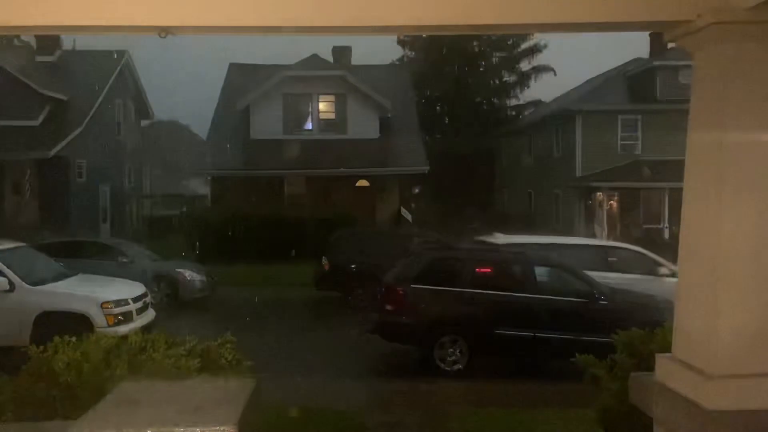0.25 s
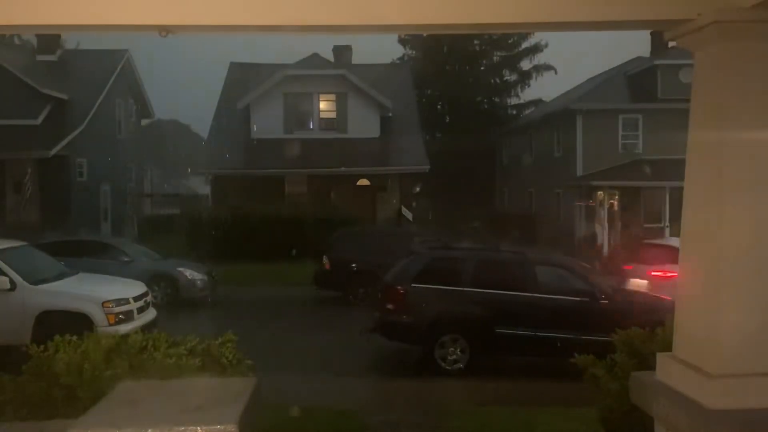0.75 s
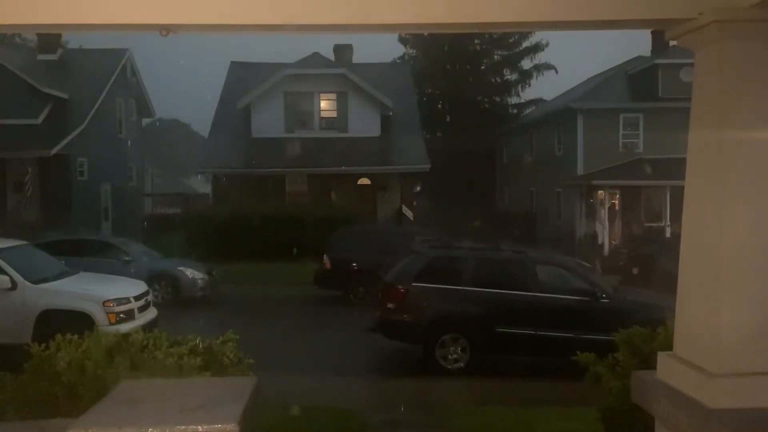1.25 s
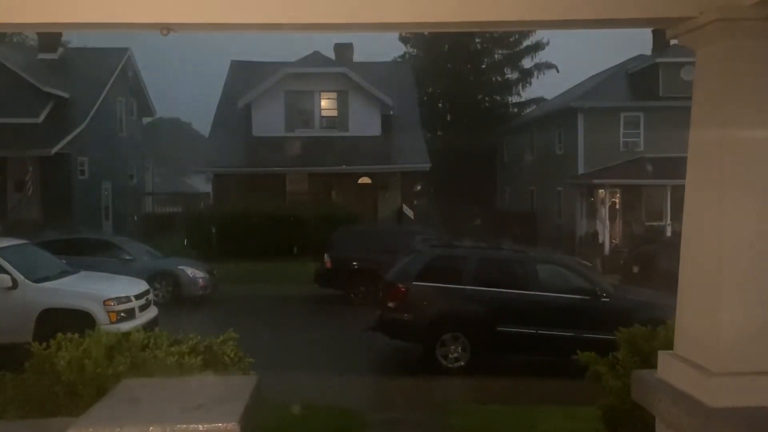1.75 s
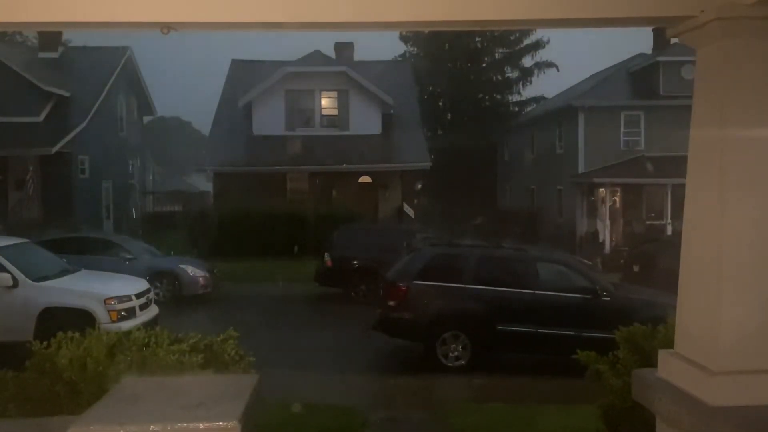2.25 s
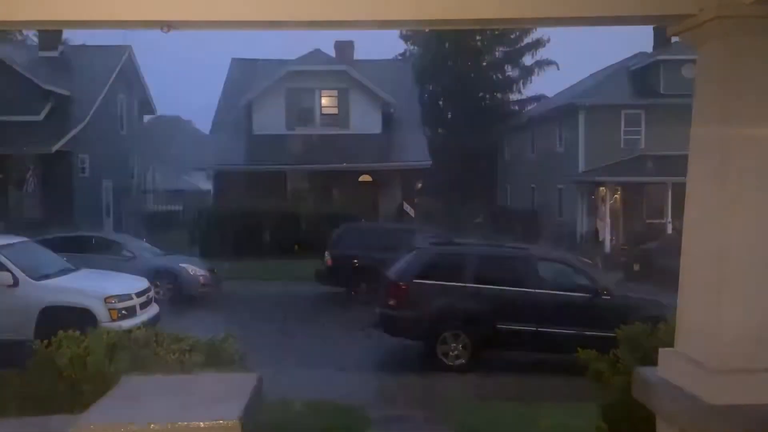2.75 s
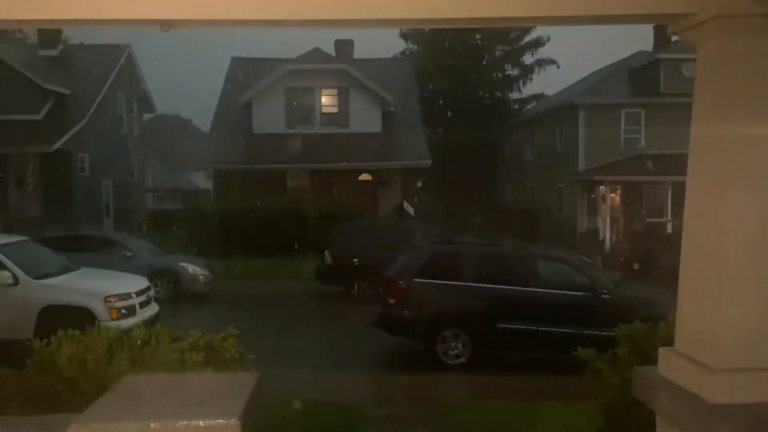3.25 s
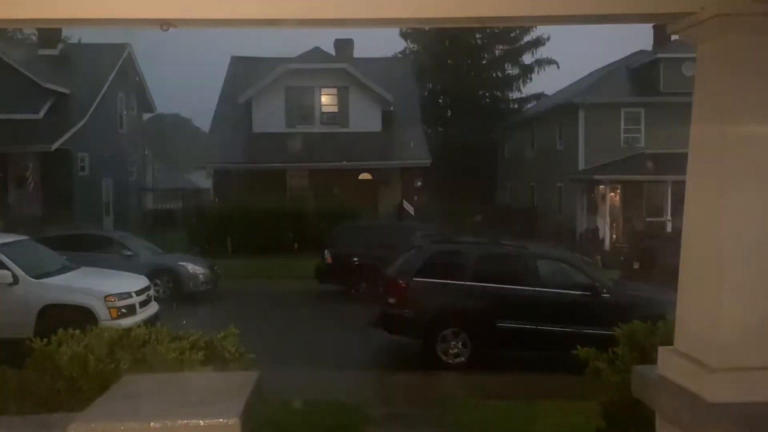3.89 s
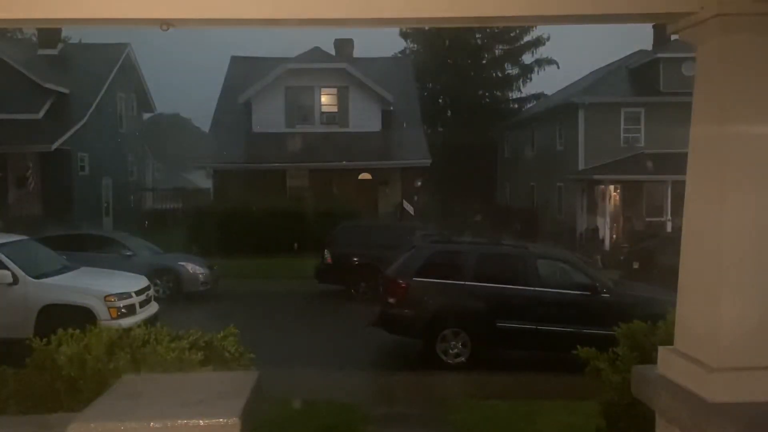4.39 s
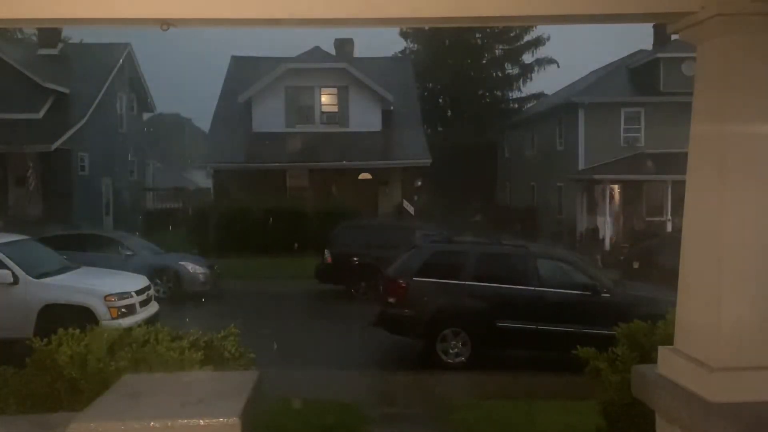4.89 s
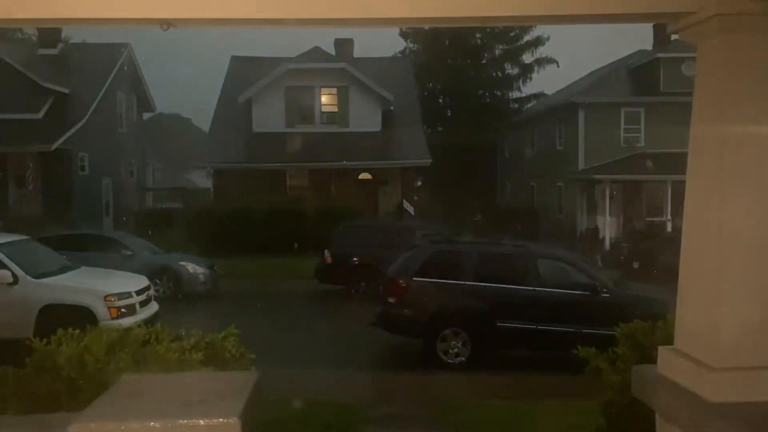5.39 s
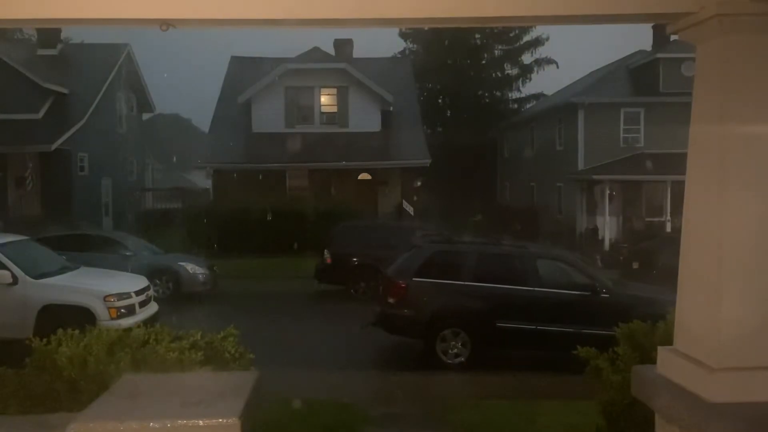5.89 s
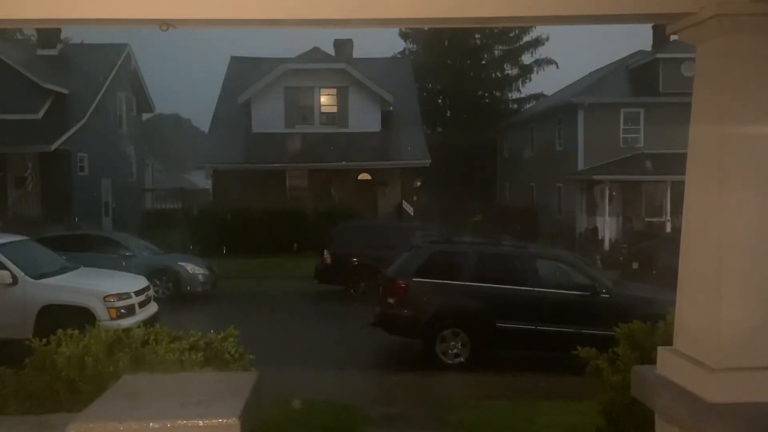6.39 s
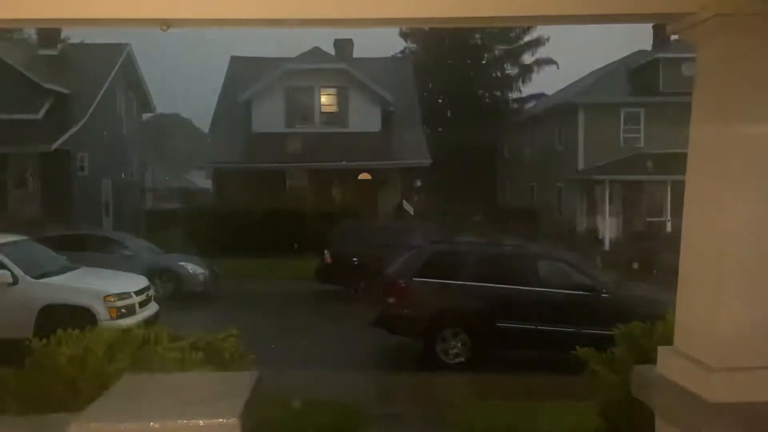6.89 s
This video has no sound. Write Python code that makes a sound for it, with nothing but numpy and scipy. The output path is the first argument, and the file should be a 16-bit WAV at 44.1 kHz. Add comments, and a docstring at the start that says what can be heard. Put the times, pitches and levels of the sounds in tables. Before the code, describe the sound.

Heard from under a porch, low thunder is already rolling, with round booms crowding the first two seconds. It then sinks into a long rumble with weaker swells. Steady rain washes the street while nearer drops patter, run-off splashes and fat drips click. A few dull, hollow knocks come close by, the clearest midway, and a tiny squeak occurs early.

```python
"""Distant thunder rolls and slowly fades over heavy rain on a residential street, heard from under a porch. It
is a crowd of random impulses, filtered into four bands that swell in peals, with sine booms on top. The rain is
filtered impulses: a far wash, a patter of drops, splashes of run-off and of wet knocks, fat drips and tiny
ticks. Dull knocks (noisy rattle, decaying modes) and a short squeak (wavering sines) sound nearby; a faint tone
comes up late. Porch resonances colour thunder, rain and splashes; impacts of water and knocks echo briefly."""
import sys
import numpy as np
from scipy import signal
from scipy.fft import rfft, irfft
from scipy.io import wavfile
from scipy.ndimage import uniform_filter1d

SR = 44100
rng = np.random.default_rng(int(sys.argv[2]) if len(sys.argv) > 2 else 0)


def log_audio(samples):
    """Write samples as a 16-bit WAV file to the path given in sys.argv[1]."""
    # one column per channel
    frames = np.atleast_2d(samples).T
    # limit to full scale, then quantise
    limited = np.clip(frames, -1, 1)
    pcm = np.round(limited * 32767).astype(np.int16)
    wavfile.write(sys.argv[1], SR, pcm)


N = 314918
TIME = np.arange(N) / SR  # s
FREQ = np.maximum(np.arange(N // 2 + 1) * SR / N, 1)  # Hz, kept above 0 for logarithms


def undb(db):
    """Level definition: decibels to amplitude gain."""
    return 10 ** (np.asarray(db) / 20)


def unit(x):
    """Power normalisation: scale to rms 1."""
    return x / np.sqrt(np.mean(x ** 2))


def spectrum(points):
    """Spectral interpolation: join (f/Hz, value) points on a log-frequency axis."""
    hz, value = np.transpose(points)
    return np.interp(np.log(FREQ), np.log(hz), value)


def bell(centre_hz, spread):
    """Band emphasis: a broad hump in dB, 6 dB down `spread` octaves from its centre."""
    octaves = np.log2(FREQ / centre_hz)
    return -20 * np.log10(1 + (octaves / spread) ** 2)


def colour(x, db):
    """Linear filtering: apply a gain in dB at every frequency, then scale to rms 1."""
    return unit(irfft(rfft(x) * undb(db), N))


def walk(rate):
    """Low-pass noise: a smooth random curve with spread 1; `rate` in Hz sets its quickness."""
    lowpass = np.exp(-(FREQ / rate) ** 2)
    return unit(irfft(rfft(rng.standard_normal(N)) * lowpass, N))


def impacts(rate, scatter_db):
    """Shot noise: two unrelated streams of `rate` impulses per s, sizes scattered exponentially in dB."""
    hit = rng.random((2, N)) < rate / SR
    size = undb(scatter_db * np.minimum(rng.exponential(size=(2, N)), 5))
    sign = rng.choice([-1, 1], (2, N))
    return unit(hit * size * sign)


def echo(x, t60, wet_db):
    """Diffuse reverberation: each impact trails its own noise, whose level falls 60 dB in t60 s."""
    keep = np.exp(-2 * np.log(1000) / (t60 * SR))
    energy = signal.lfilter([1 - keep], [1, -keep], x ** 2)
    reflections = np.sqrt(energy) * rng.standard_normal(x.shape)
    return unit(x + undb(wet_db) * reflections)


def swell(s, rise, decay):
    """Transient envelope: a Gaussian climb to 1 at s, then exponential decay (1/e times, s)."""
    t = TIME - s
    return np.exp(-np.minimum(np.where(t < 0, (t / rise) ** 2, t / decay), 50))


def burst(source, s, rise, decay):
    """Energy scaling: shape a sound by a swell and give it the energy of rms-1 noise so shaped."""
    shape = swell(s, rise, decay)
    return unit(source * shape) * np.sqrt(np.mean(shape ** 2))


# resonances of the porch: f/Hz, full width at half the lift/Hz, lift/dB
PORCH_MODES = [(112, 22, 1.5), (132, 13, 4), (277.5, 13, 10.5), (428, 7.7, 6), (502, 30, 3.5),
               (1283, 70, 5.5), (2103, 120, 4), (2860, 110, 1)]


def porch_resonances():
    """Resonance: the porch lifts the sound around each of its modes; result in dB."""
    return sum(db / (1 + (2 * (FREQ - hz) / width) ** 2) for hz, width, db in PORCH_MODES)


# long rumble, one row each for sub-bass, deep part, body and growl: level at start/dB, fade/(dB/s)
RUMBLE_FADES = [(-44, 0.59), (-40.5, 0.27), (-42.5, 0.38), (-45.5, 0.31)]
# peals out of the rumble: crest t/s, sub-bass level/dB, deep level/dB, body level/dB, growl level/dB, rise/s
PEAL_SWELLS = [(0.069, -36, -41.5, -40, -52.5, 0.069), (0.3, -44, -53, -41.5, -46.5, 0.097),
               (0.5, -42.5, -47.5, -44, -53.5, 0.09), (0.65, -53, -30, -39, -45, 0.032),
               (0.76, -47.5, -37.5, -36, -50, 0.098), (0.87, -32.5, -43, -39, -47.5, 0.04),
               (0.98, -42.5, -34.5, -38, -43.5, 0.11), (1.17, -40.5, -42.5, -33, -48.5, 0.091),
               (1.32, -49, -34.5, -37.5, -57, 0.072), (1.70, -46.5, -35.5, -36, -56.5, 0.08),
               (1.95, -47, -47, -35, -44, 0.039), (2.82, -45, -46, -40, -47, 0.35),
               (3.42, -54, -44, -41.5, -43.5, 0.22), (3.6, -51, -36.5, -43, -49, 0.05),
               (5.4, -54.5, -42.5, -45.5, -54, 0.29), (6.28, -44, -52.5, -38, -48, 0.09)]
PEAL_TAIL = 1.55  # a peal's decay time over its rise time


def rolling():
    """Incoherent addition: peals add their power to the fading rumble; gives four band levels."""
    power = np.array([undb(db - fade * TIME) ** 2 for db, fade in RUMBLE_FADES])
    for s, sub_db, deep_db, body_db, growl_db, rise in PEAL_SWELLS:
        crest = undb([[sub_db], [deep_db], [body_db], [growl_db]])
        power = power + (crest * swell(s, rise, PEAL_TAIL * rise)) ** 2
    return np.sqrt(power)


# colour of the thunder, effective within each band: f/Hz, relative density level/dB per Hz
THUNDER_COLOUR = [(20, -32.5), (30, -18.5), (45, -7), (60, -1), (75, -3.5), (100, 7), (122, -0.5), (155, 1),
                  (180, -7), (225, -11), (250, -18), (285, -21.5), (320, -22.5), (1000, -54)]


def thunder(sub_hz=78, deep_hz=120, growl_hz=185, throb_db=0.7, throb_hz=7):
    """Superposition: waves from all along the lightning channel arrive in a crowd, dulled by distance."""
    sub, deep, body, growl = rolling()
    arrivals = impacts(rate=900, scatter_db=0.35)
    waves = rfft(arrivals) * undb(spectrum(THUNDER_COLOUR) + porch_resonances())
    below_sub, below_deep, below_growl = (1 / (1 + (FREQ / hz) ** 16) for hz in (sub_hz, deep_hz, growl_hz))
    air = 1 / (1 + (FREQ / 1500) ** 4)
    throb = undb(throb_db * walk(throb_hz))
    bands = [
        (below_sub, sub),
        (below_deep - below_sub, deep * throb),
        (below_growl - below_deep, body * throb),
        ((1 - below_growl) * air, growl),
    ]
    out = 0
    for share, level in bands:
        band = irfft(waves * share, N)
        # even out the crowd over 1/7 s, so the peals and the throb give its swells
        power = uniform_filter1d(band[0] ** 2, size=SR // 7)
        out = out + band / np.sqrt(power) * level
    return out


# single booms, before the stereo stage: crest t/s, rms level at crest/dB, f/Hz
BOOM_WAVES = [(0.083, -30.5, 95), (0.747, -28.5, 140), (0.801, -30, 138), (0.924, -26.5, 135),
              (1.02, -27.5, 128), (1.097, -27, 125), (1.159, -32.5, 138), (1.368, -28.5, 130),
              (1.721, -29.5, 118), (2.781, -27.5, 75), (4.117, -33.5, 85)]
BOOM_RISE_S, BOOM_DECAY_S = 0.018, 0.034


def booms():
    """Tone bursts: the strongest pressure waves stand out of the roll as short, round booms."""
    out = np.zeros((2, N))
    turns = rng.random(len(BOOM_WAVES))  # random starting phases
    for (s, db, hz), turn in zip(BOOM_WAVES, turns):
        wave = np.sqrt(2) * np.sin(2 * np.pi * (hz * TIME + turn))
        out[0] += undb(db) * swell(s, BOOM_RISE_S, BOOM_DECAY_S) * wave
    return out


# colours of the far wash and the near patter: f/Hz, relative density level/dB per Hz
WASH_COLOUR = [(150, -4), (350, 3.5), (600, 4), (850, 0.5), (1150, -1), (1350, 0), (1500, -6), (1900, -4),
               (2400, -7.5), (4000, -13), (6000, -27), (7600, -35.5), (8700, -57.5), (12000, -47),
               (13000, -64.5)]
PATTER_COLOUR = [(1200, -10.5), (1800, -18), (2150, -11.5), (2400, -9.5), (2700, 2.5), (3100, -1.5),
                 (3400, -7), (3900, -10.5), (4600, -13.5), (5700, -18), (6900, -16.5), (7800, -21.5),
                 (8700, -48), (10300, -33), (12000, -39.5), (13000, -59)]
# the wash slackens from a moment on; the patter fades all along
WASH_DB, SLACKENS_S, SLACKEN_DB_PER_S = -52.5, 2.92, 1.1
PATTER_DB, PATTER_FADE_DB_PER_S = -59, 0.32


def rain(drops_db=-17):
    """Shot noise: countless far drops merge into a wash; nearer ones patter in flurries, a few tick."""
    far_db = WASH_DB - SLACKEN_DB_PER_S * np.maximum(TIME - SLACKENS_S, 0)
    near_db = PATTER_DB - PATTER_FADE_DB_PER_S * TIME
    porch_db = porch_resonances()
    far = echo(impacts(rate=5000, scatter_db=2.0), t60=0.069, wet_db=-6)
    wash = colour(far, spectrum(WASH_COLOUR) + porch_db)
    flurry = undb(0.23 * walk(rate=45) + 1.7 * walk(rate=11))
    small_drops = unit(impacts(rate=5400, scatter_db=0.9) * flurry)
    fat_drops = undb(drops_db) * impacts(rate=33, scatter_db=6.0)
    near = echo(small_drops + fat_drops, t60=0.03, wet_db=-1.5)
    patter = colour(near, spectrum(PATTER_COLOUR) + porch_db)
    return wash * undb(far_db + 1.1 * walk(rate=16.0)) + patter * undb(near_db)


# splashes of water: crest t/s, level at crest/dB, decay/s, centre f/Hz, spread/octaves; most are run-off
# splashing down, while the rows at 0.606 s and 1.244 s are the wet sprays of the knocks there
SPRAYS = [(.305, -53, 0.066, 2780, 0.22), (.565, -54, 0.036, 2690, 0.27), (.606, -57.5, 0.046, 2800, 0.34),
          (1.244, -60, 0.081, 3300, 1.8), (1.93, -55.5, 0.099, 2200, 0.38), (2.29, -58, 0.037, 3160, 0.71),
          (2.66, -58, 0.048, 3100, 0.28), (3.259, -58, 0.066, 2250, 0.33),
          (3.499, -50.5, 0.045, 2630, 0.44), (3.645, -59.5, 0.031, 2800, 0.49),
          (4.514, -60, 0.021, 3560, 0.52), (5.116, -54, 0.035, 2880, 0.29), (5.53, -57.5, 0.026, 3360, 0.2),
          (5.665, -60, 0.076, 3340, 0.36), (6.20, -55.5, 0.024, 3350, 0.32),
          (6.293, -58.5, 0.035, 3370, 0.3), (6.884, -57, 0.013, 3120, 0.39),
          (6.95, -58.5, 0.18, 2700, 0.45)]
SPLASH_RISE = 0.4  # a splash's rise time over its decay time


def splashes(low_hz=1200, high_hz=6500):
    """Band-limited shot noise: each gush of run-off, or a knock's wet contact, bursts into a spray of droplets
    with little bass."""
    spray = echo(impacts(rate=2800, scatter_db=0.5), t60=0.074, wet_db=-5.5)
    edges = 1 / (1 + (low_hz / FREQ) ** 4) / (1 + (FREQ / high_hz) ** 6)
    spray = rfft(spray) * undb(porch_resonances()) * edges
    out = 0
    for s, db, decay, centre_hz, spread in SPRAYS:
        splash = unit(irfft(spray * undb(bell(centre_hz, spread)), N))
        out = out + undb(db) * burst(splash, s, SPLASH_RISE * decay, decay)
    return out


# single fat drops close by: crest t/s, level at crest/dB, decay/s, centre f/Hz, spread/octaves
FAT_DRIPS = [(0.521, -42, 0.0071, 2740, 0.15), (0.527, -50, 0.0064, 2200, .15),
             (0.597, -44.5, 0.0087, 2050, 0.56), (0.884, -46.5, 0.015, 2650, 0.38),
             (1.218, -57, .012, 3000, 0.46), (1.396, -49.5, 0.0067, 2350, .27),
             (1.795, -53.5, 0.017, 2730, .27), (1.93, -54, 0.0068, 2730, 0.21),
             (2.443, -52.5, .012, 2700, .27), (2.748, -56, 0.0061, 2840, .27),
             (3.703, -52, 0.013, 2720, 0.25), (4.038, -53.5, 0.013, 2870, 0.23),
             (5.236, -50.5, 0.018, 2730, 0.15), (6.676, -55, 0.043, 2840, .27),
             (6.87, -53.5, 0.0092, 2860, 0.34), (6.923, -56, 0.0082, 2970, .27)]
DRIP_RISE_S = 0.0005  # shared with the ticks


def drips(low_hz=1000, high_hz=6500):
    """Impact transient: a fat drop bursts at once on a hard surface and its spray soon dies."""
    edges_db = -20 * np.log10((1 + (low_hz / FREQ) ** 4) * (1 + (FREQ / high_hz) ** 4))
    spray = echo(impacts(rate=4700, scatter_db=-1.0), t60=0.05, wet_db=2.0)
    out = 0
    for s, db, decay, centre_hz, spread in FAT_DRIPS:
        drop = colour(spray, bell(centre_hz, spread) + edges_db)
        out = out + undb(db) * burst(drop, s, DRIP_RISE_S, decay)
    return out


# tiny bright ticks of the closest drops: crest t/s, level at crest/dB, decay/s
CLOSE_TICKS = [(.521, -71, .005), (.599, -78, .005), (2.746, -73, .004)]


def ticks(centre_hz=10500, spread=0.64):
    """High-frequency transient: the closest drops land with a thin, sharp snap of filtered noise."""
    snap = colour(rng.standard_normal((2, N)), bell(centre_hz, spread))
    return sum(undb(db) * burst(snap, s, DRIP_RISE_S, decay) for s, db, decay in CLOSE_TICKS)


# colour of a knock's rattle: f/Hz, relative density level/dB per Hz
RATTLE_COLOUR = [(200, -0.5), (330, 6), (430, 0.5), (560, 1), (700, 2.5), (900, 2), (1100, -0.5),
                 (1320, -2.5), (1450, -13.5), (1900, -4.5), (2100, 2.5), (2400, -13.5), (5000, -20),
                 (9000, -48), (13000, -57)]
# dull knocks: rattle crest t/s, rattle level/dB, ring drive level/dB (before the mode weights), rise/s,
# rattle decay/s, centre f/Hz, spread/octaves
KNOCK_BLOWS = [(.534, -54, -57, 0.0073, .025, 950, .5), (.605, -47, -58, 0.013, 0.036, 1230, 1.2),
               (1.245, -46, -54, 0.011, 0.059, 1000, 1.5), (3.494, -49, -41, 0.012, 0.084, 1310, 0.41),
               (3.526, -44, -33.5, 0.024, 0.095, 510, 0.67), (6.345, -51.5, -54, .007, .018, 1250, 0.8),
               (6.363, -51.5, -51.5, 0.015, 0.043, 420, 0.9), (6.52, -50, -58, .007, 0.035, 560, 1.4),
               (6.944, -56, -69, 0.015, 0.024, 650, 1.2)]
# modes of the struck body: f/Hz, t60/s, relative level/dB
BODY_MODES = [(424, .38, 0), (463, .22, -5), (533, .3, -18), (680, .36, -1), (707, .27, -7), (1062, .2, -8),
              (1100, .32, -2), (1207, .26, -4), (1280, .25, -7), (2120, .2, -8)]


def knocks():
    """Modal excitation: each soft blow rattles briefly and rings a hollow body, most near its centre."""
    rattle = echo(impacts(rate=2200, scatter_db=0.0), t60=0.085, wet_db=-1.5)
    out = np.zeros((2, N))
    for s, contact_db, blow_db, rise, decay, centre_hz, spread in KNOCK_BLOWS:
        reach_db = bell(centre_hz, spread)
        contact = colour(rattle, reach_db + spectrum(RATTLE_COLOUR))
        out += undb(contact_db) * burst(contact, s, rise, decay)
        t = np.maximum(TIME - s + rise, 0)  # the ring starts one rise time before the crest
        push = undb(blow_db) * (1 - np.exp(-t / rise))
        for hz, t60, db in BODY_MODES:
            ring = np.exp(-np.log(1000) * t / t60) * np.sin(2 * np.pi * hz * TIME)
            out[0] += undb(db + np.interp(hz, FREQ, reach_db)) * push * ring
    return out


# partials of the squeak: f/Hz, level relative to SQUEAK_DB/dB
SQUEAK_TONES = [(958, 1.5), (1701, -15), (2089, -15), (2605, -14), (3130, -15)]
SQUEAK_S, SQUEAK_DB = 1.221, -48.5  # level before the stereo stage
SQUEAK_RISE_S, SQUEAK_HOLD_S, SQUEAK_DECAY_S = 0.005, 0.02, 0.014


def squeak(waver=0.006):
    """Inharmonic partials: rubbing holds a few tones on a nearly steady pitch for an instant."""
    held = np.clip(TIME, SQUEAK_S, SQUEAK_S + SQUEAK_HOLD_S)  # a crest that lasts for the hold
    level = swell(held, SQUEAK_RISE_S, SQUEAK_DECAY_S)
    clock = np.cumsum(1 + waver * walk(rate=79)) / SR  # time that runs unevenly, so pitch wavers
    out = np.zeros((2, N))
    for hz, db in SQUEAK_TONES:
        out[0] += np.sqrt(2) * undb(SQUEAK_DB + db) * level * np.sin(2 * np.pi * hz * clock)
    return out


def faint_tone(hz=537, db=-68, start=6.45, fade=0.11):
    """Random modulation: a faint tone fades in late and wavers in pitch and level."""
    phase = 2 * np.pi * np.cumsum(hz + 4 * walk(rate=14)) / SR
    level = undb(db + 4.6 * walk(rate=7.2)) * np.clip((TIME - start) / fade, 0, 1)
    return np.sqrt(2) * level * np.array([np.sin(phase), np.cos(phase)])


# correlation of left and right, limited to +-0.99 in use: f/Hz, correlation
EAR_LIKENESS = [(30, 1), (150, 0.97), (270, 0.91), (330, 0.41), (450, 0.68), (800, 0.29), (1300, 0.28),
                (1600, 0.24), (1950, -0.31), (2200, 1), (2600, 0.71), (4000, 0.66), (7000, 0.55)]
# lean of the whole mix: f/Hz, left minus right level/dB
LEFT_LEAN = [(100, -0.5), (200, 1.5), (300, 3), (420, 0), (800, 0.5), (1300, 3), (2800, 5), (4000, 4),
             (5300, 5.5), (6500, 0.5)]


def stereo(common, diffuse):
    """Interaural correlation: share common and diffuse spectra between the ears, mostly leaning left."""
    likeness = np.clip(spectrum(EAR_LIKENESS), -.99, .99)
    sides = np.array([[1], [-1]])
    ears = common * np.sqrt((1 + likeness) / 2) + sides * diffuse * np.sqrt((1 - likeness) / 2)
    return irfft(ears * undb(sides * spectrum(LEFT_LEAN) / 2), N)


def scene():
    """Superposition: all sources add; booms, squeak and the knocks' ring have only a common part."""
    storm = thunder() + booms()
    water = rain() + splashes() + drips() + ticks()
    nearby = knocks() + squeak()
    common, diffuse = rfft(storm + water + nearby + faint_tone())
    return stereo(common, diffuse)


def record(dry):
    """Band limitation: a steep elliptic low-pass cuts the top above 15.5 kHz."""
    lowpass = signal.ellip(8, .2, 60, 15500, fs=SR, output="sos")  # order, ripple dB, rejection dB, Hz
    return signal.sosfilt(lowpass, dry)


dry = scene()
out = record(dry)
log_audio(out)
```